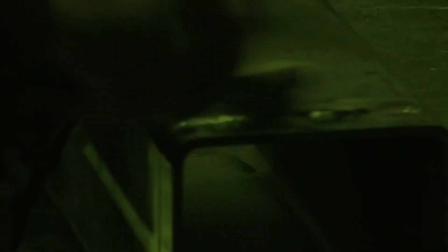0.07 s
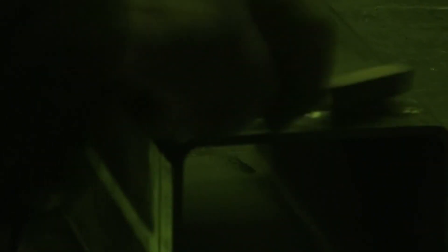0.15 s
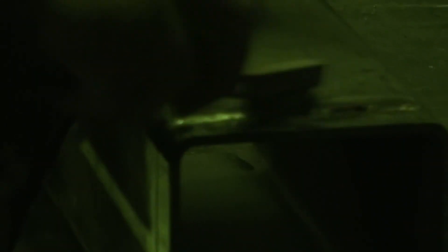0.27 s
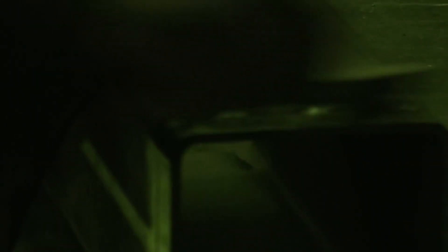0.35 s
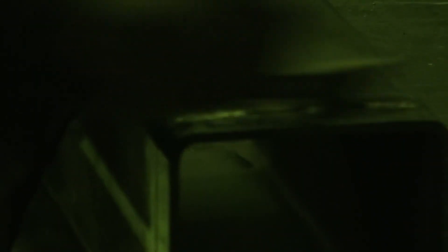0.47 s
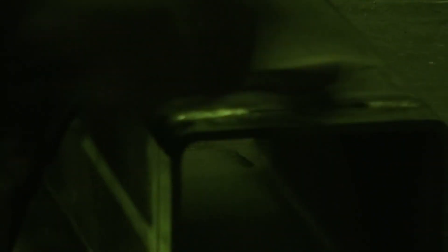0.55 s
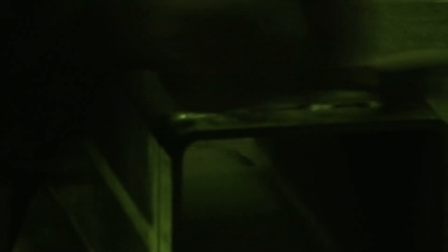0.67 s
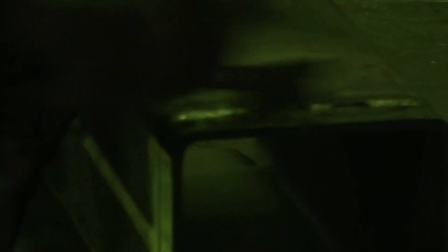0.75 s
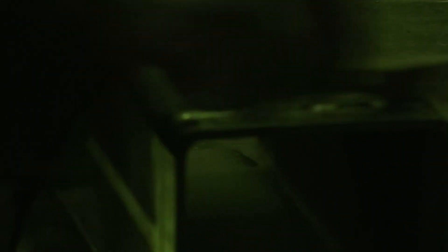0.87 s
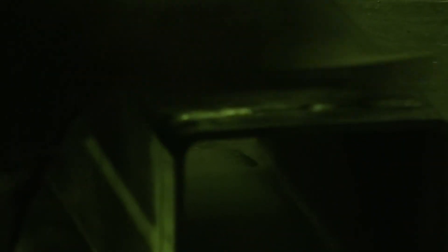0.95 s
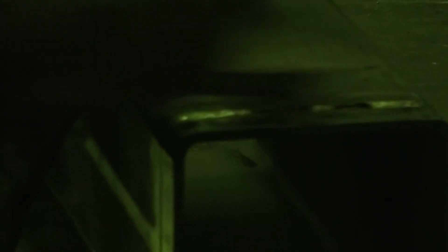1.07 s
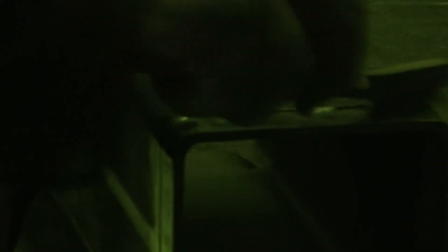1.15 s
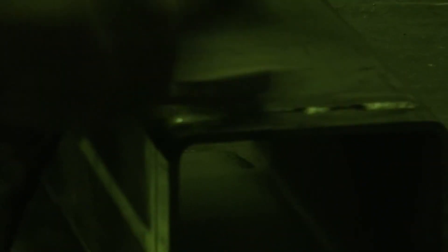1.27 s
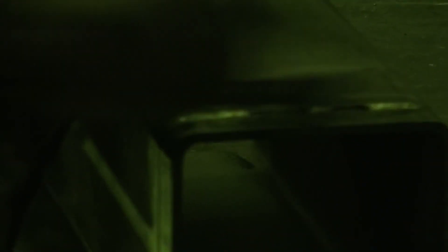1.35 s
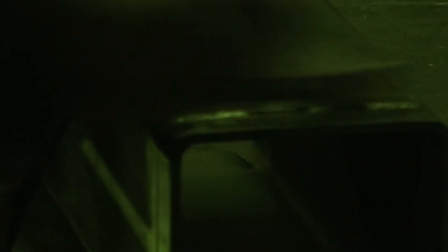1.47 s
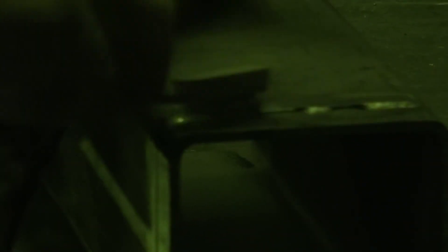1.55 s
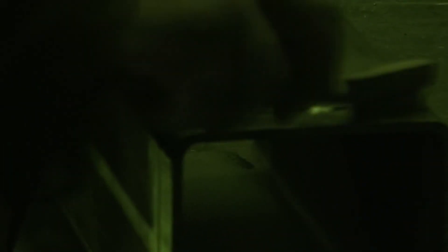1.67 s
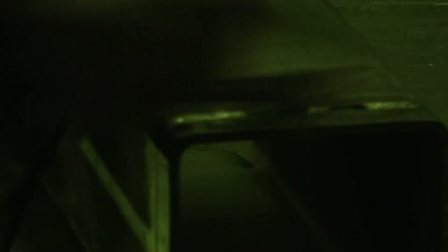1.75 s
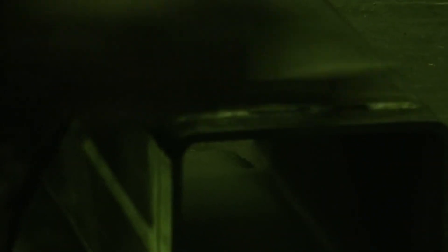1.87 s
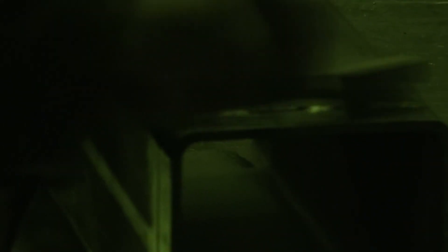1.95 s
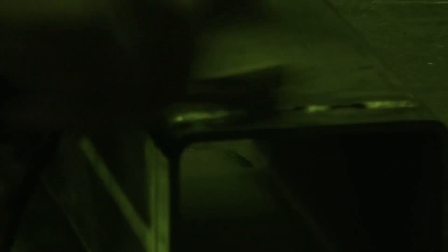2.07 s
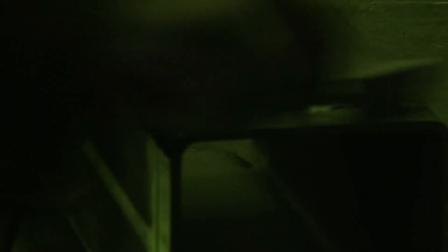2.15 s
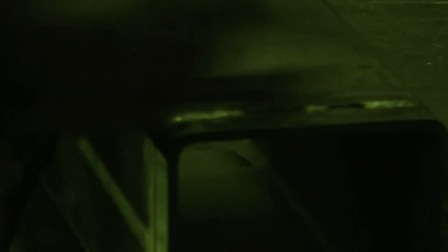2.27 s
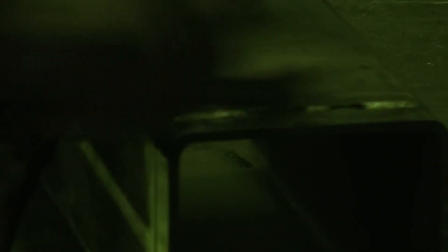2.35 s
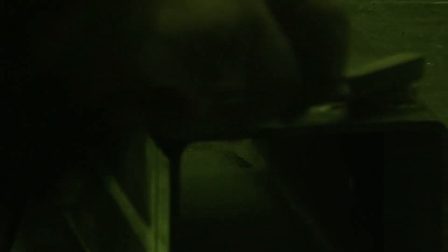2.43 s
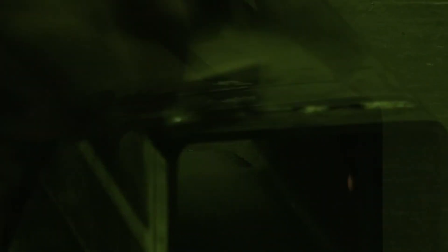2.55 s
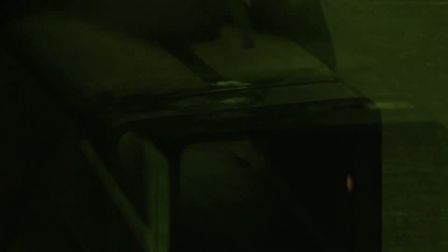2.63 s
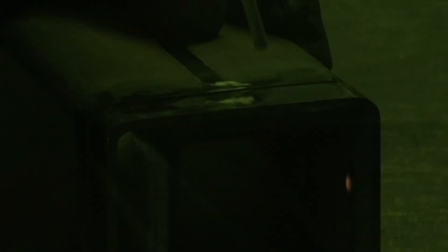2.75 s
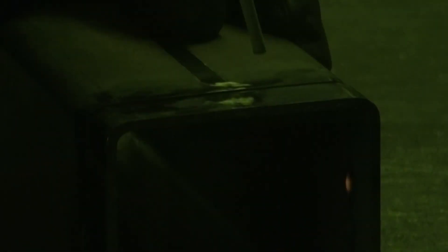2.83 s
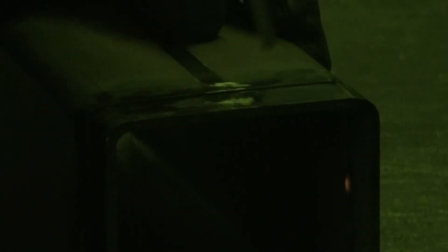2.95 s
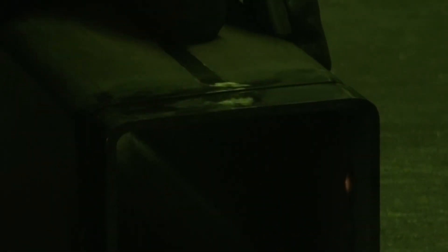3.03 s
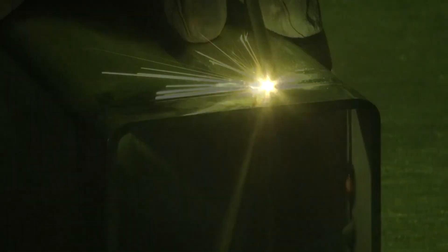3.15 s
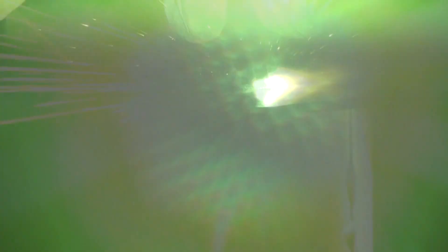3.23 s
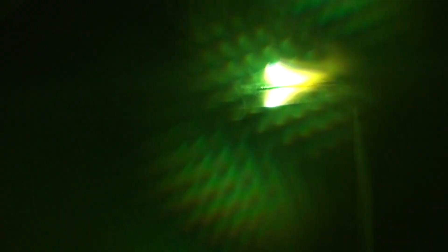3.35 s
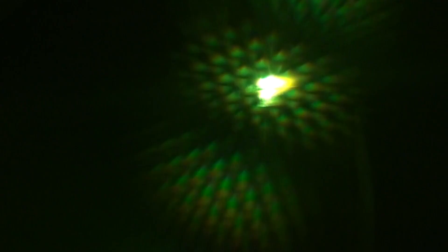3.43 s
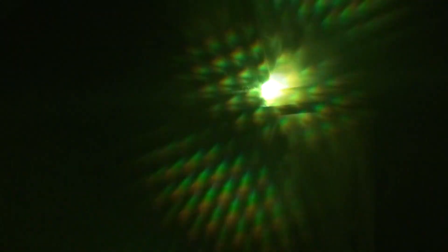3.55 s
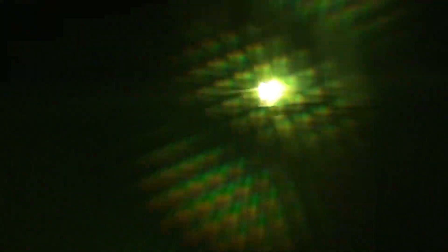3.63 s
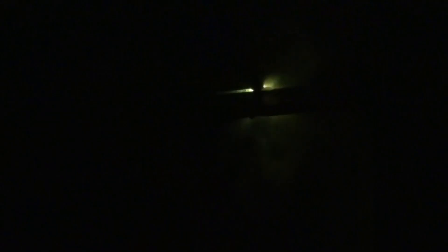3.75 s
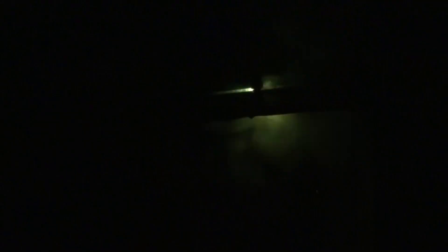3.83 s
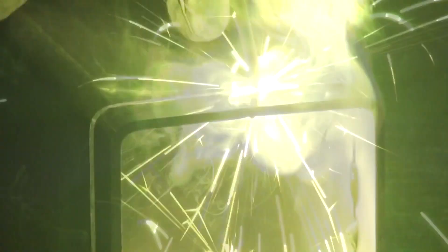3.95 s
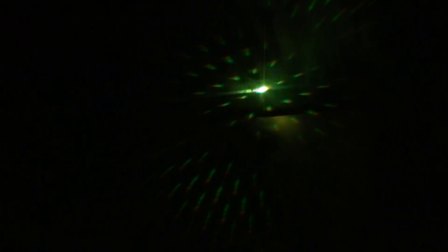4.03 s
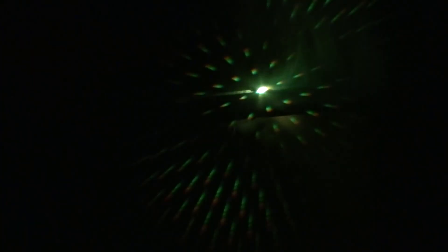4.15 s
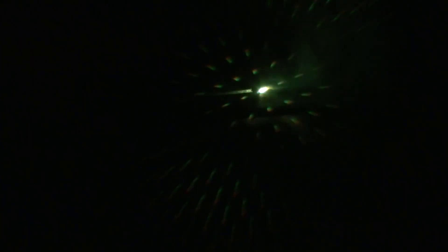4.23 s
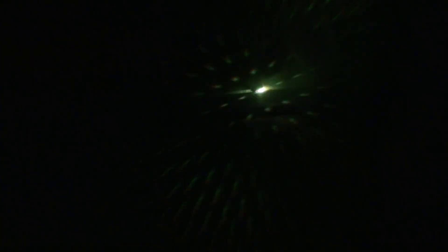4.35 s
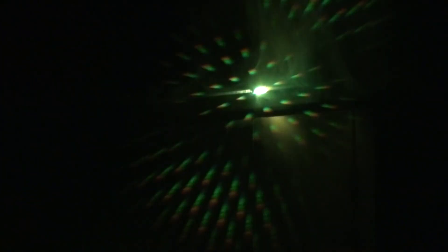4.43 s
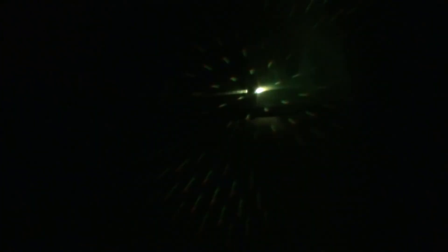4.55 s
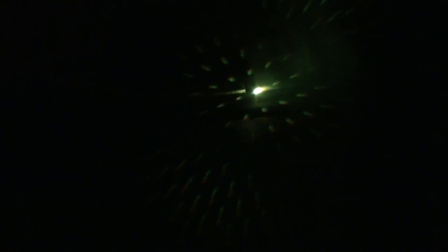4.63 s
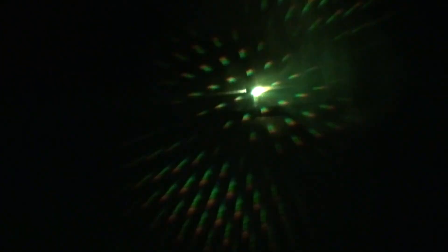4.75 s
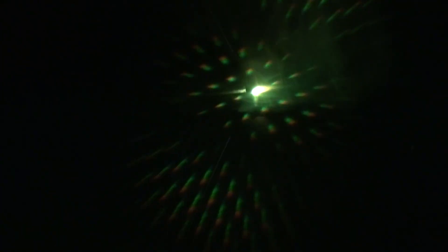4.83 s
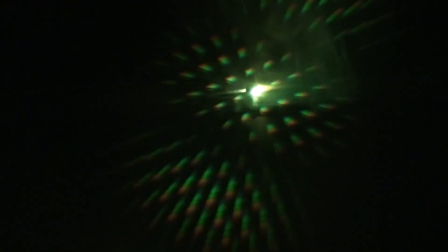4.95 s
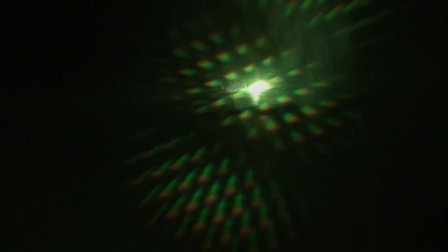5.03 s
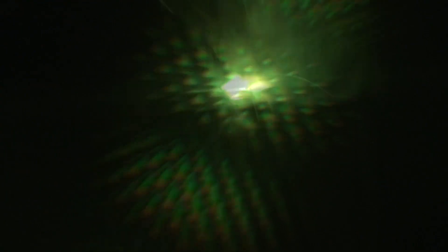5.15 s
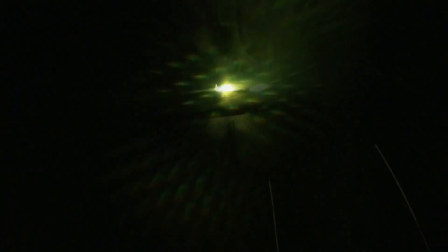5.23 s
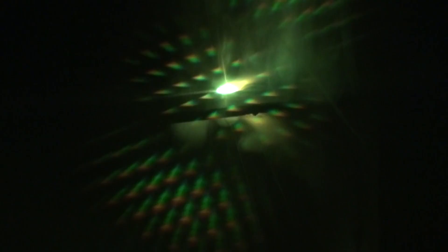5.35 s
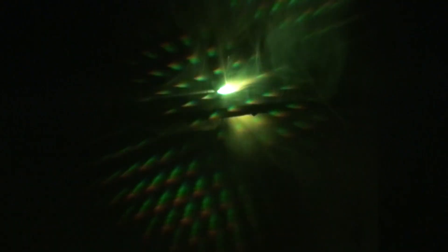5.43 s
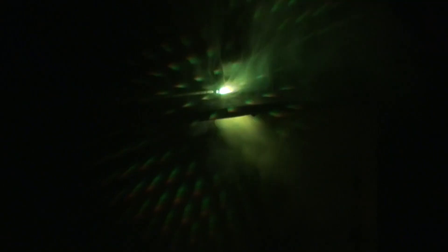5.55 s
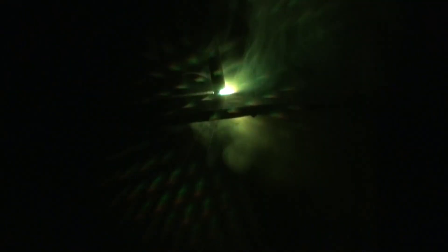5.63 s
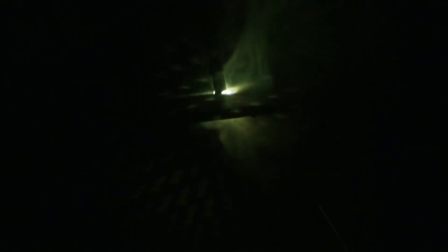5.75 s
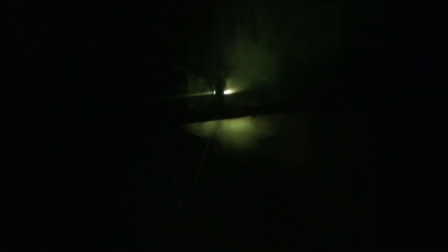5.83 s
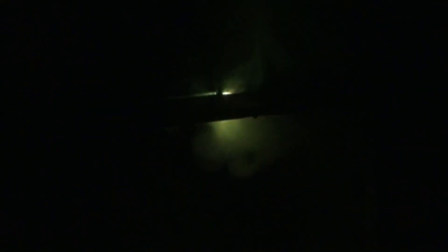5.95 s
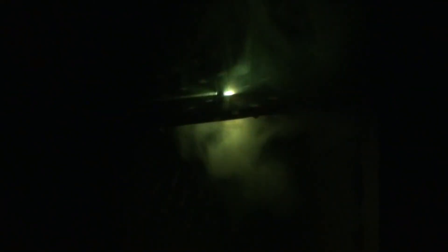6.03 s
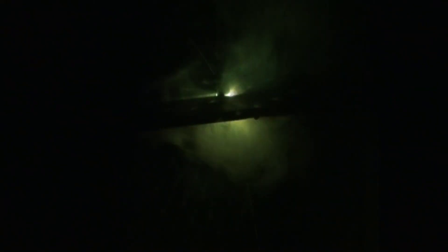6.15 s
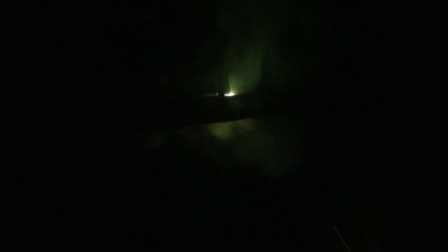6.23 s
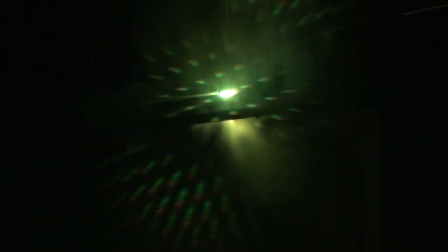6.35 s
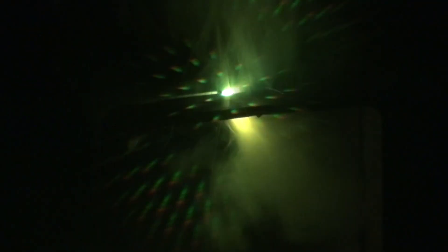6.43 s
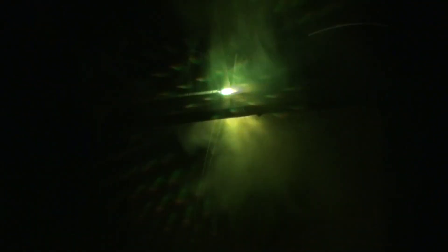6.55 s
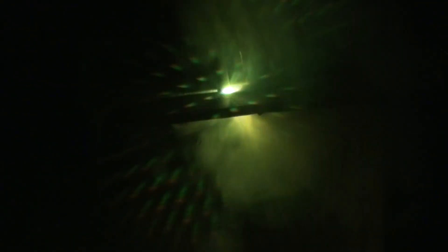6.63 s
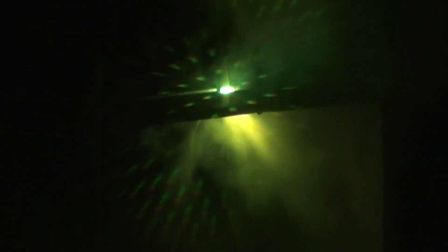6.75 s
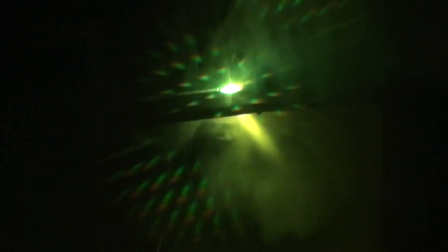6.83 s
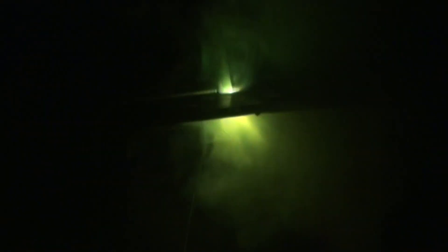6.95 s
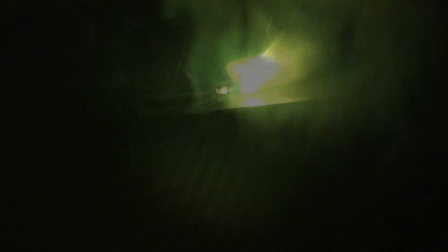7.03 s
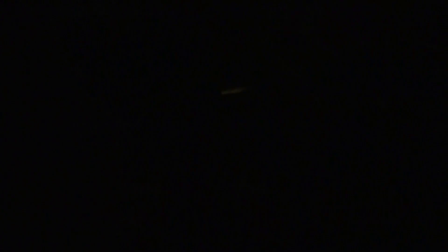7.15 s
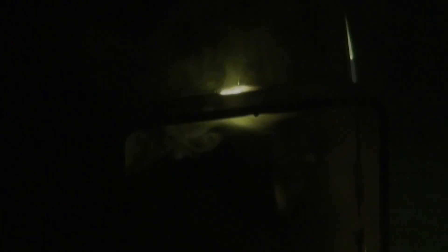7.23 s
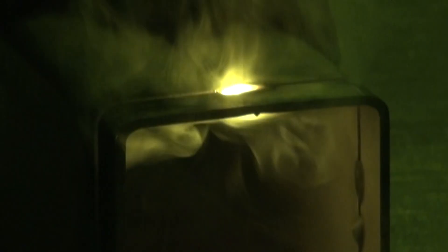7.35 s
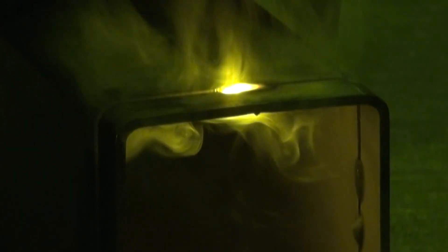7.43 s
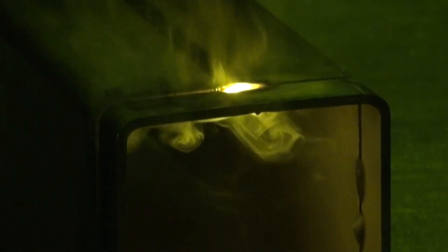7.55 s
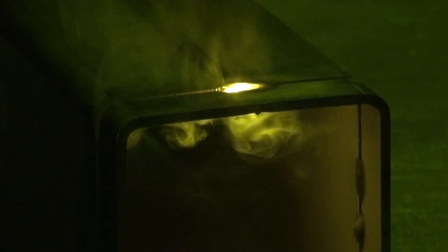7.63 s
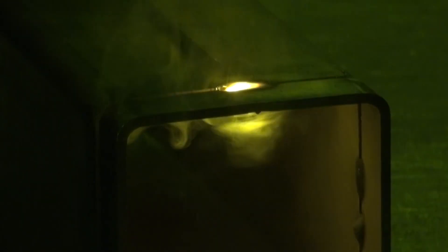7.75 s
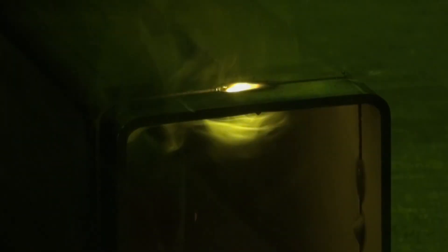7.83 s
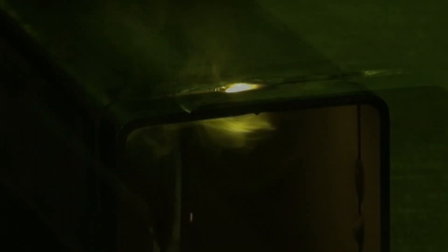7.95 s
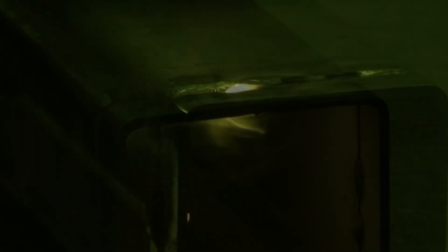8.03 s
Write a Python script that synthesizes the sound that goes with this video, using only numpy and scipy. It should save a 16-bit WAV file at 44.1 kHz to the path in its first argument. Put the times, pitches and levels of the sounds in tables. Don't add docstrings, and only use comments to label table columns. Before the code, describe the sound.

Slag is scraped off a steel tube over a whirring fan; a rod clanks, and a welding arc hisses and snaps loudly, then stops.

```python
import sys
import numpy as np
from scipy import signal
from scipy.fft import rfft, irfft, next_fast_len
from scipy.io import wavfile
from scipy.ndimage import uniform_filter1d, map_coordinates

SR = 44100
rng = np.random.default_rng(int(sys.argv[2]) if len(sys.argv) > 2 else 0)


def output_pcm(signal):
    pcm = np.clip(np.atleast_2d(signal).T, -1, 1) * 32767
    wavfile.write(sys.argv[1], SR, np.round(pcm).astype(np.int16))


def amplitude_ratio(level_db):
    exponent = np.asarray(level_db, float) / 20
    return 10 ** exponent


N = 356769

# multiple of the blade rate, level in dB.
BLADE_TONES = [(1, -45), (2, -57), (3, -58), (8, -55), (15.8, -52), (16, -49.5)]
# frequency in Hz, level in dB.
HUM_TONES = [(60, -44.5), (120, -57.5), (183, -40.5)]
# frequency in Hz, level in dB per Hz.
AIR_COLOUR = [(60, 1), (120, 1), (200, 1), (400, -1), (520, -2), (585, 6), (650, 0.5), (1000, 0),
              (2300, 1.5), (2900, -1.5), (4000, -9.5), (5300, -7.5), (6300, -8.5), (13000, -15)]
BLADE_16_HZ, LOAD_SAG_HZ, FOLLOW_S = 4571, 5.5, .3

# frequency in Hz, time to fall 60 dB in seconds.
ROOM_DECAY = [(300, 0.34), (3000, 0.46), (10000, 0.16)]

# middle in seconds, length in seconds, level in dB.
STROKES_TO_AND_FRO = [(.11, .08, -77), (.22, 0.11, -69), (0.333, .09, -69), (0.446, 0.12, -65),
                      (.57, 0.11, -66.5), (0.695, .11, -64), (0.833, 0.14, -65), (0.955, 0.13, -66),
                      (1.07, 0.15, -65.5), (1.21, 0.18, -63.5), (1.318, 0.078, -65), (1.385, 0.069, -63),
                      (1.463, 0.066, -63), (1.566, 0.17, -65.5), (1.668, .06, -67), (1.73, 0.11, -63),
                      (1.828, 0.12, -65), (1.925, 0.1, -60.5), (1.985, 0.078, -64), (2.08, 0.14, -65),
                      (2.215, 0.14, -64), (2.31, 0.08, -65), (2.37, 0.12, -71)]
# time in seconds, peak in dB.
SLAG_FLAKES = [(0.0892, -69), (0.2199, -62), (0.4668, -65), (0.6709, -60.5), (0.8799, -68), (0.9398, -69),
               (0.9597, -64), (1.0166, -67), (1.0605, -59), (1.145, -46), (1.2486, -64), (1.2999, -66),
               (1.3857, -61.5), (1.4321, -64), (1.5415, -52), (1.6526, -42), (1.7928, -70), (1.8891, -62),
               (1.921, -58), (1.9693, -54), (2.0492, -67), (2.1505, -65), (2.1811, -41), (2.2902, -63),
               (2.3116, -50), (2.4229, -43)]
# frequency in Hz, level in dB per Hz.
GRIT_COLOUR = [(300, -28), (1500, 2), (3000, 1), (7000, 5), (13000, 7)]
CONTACT_START_S, CONTACT_END_S, DRAG_DB = .08, 2.435, -83

# time in seconds, level in dB.
ROD_KNOCKS = [
    (3.218, -20),
    (3.2205, -9),
    (3.227, -22),
    (3.235, -19),
    (3.25, -21),
    (3.264, -17),
    (3.292, -18),
    (3.355, -19),
]
# frequency in Hz, level in dB, time to fall 60 dB in seconds.
TUBE_RINGS = [(467, -5, .15), (920, -10, .12), (1079, -11, .2), (1540, -11, .2), (1659, -6, .2),
              (2133, -3, .1), (2205, 0, .16), (2434, -2, .1), (2800, -5, .1), (3282, 2, .25),
              (4470, 0, .15), (5060, -5, .12), (5889, -7, .15), (6982, -4, .12)]
# frequency in Hz, level in dB per Hz.
CLATTER_COLOUR = [(200, -23), (500, -16), (1200, -12.5), (2200, -7.5), (3500, -18), (6000, -9.5),
                  (9000, -11), (14000, -15)]

# time in seconds, current as hiss level in dB, thin fizz over hiss in dB
ARC_COURSE = [(3.28, -29.5, -34), (3.45, -29, -45), (3.64, -26.5, -38), (3.8, -29, -34.5), (4.2, -28, -30),
              (4.55, -28, -34.5), (4.75, -29, -33.5), (5.0, -25.5, -35.5), (5.2, -29.5, -35),
              (5.46, -22.5, -35.5), (5.68, -24.5, -35.5), (5.88, -29, -36), (6.3, -31, -35),
              (6.55, -22, -38), (6.7, -27, -39), (6.8, -19.5, -34.5), (7.09, -27.5, -37), (7.15, -38, -42)]
# start in seconds, dB over the hiss,
# low roar in dB over that.
METAL_FLARES = [(3.355, -15, 24), (3.63, 2.5, -11), (3.759, 16, -4), (4.06, 2.5, 8), (4.52, 4.5, -5),
                (4.87, 1, -4), (4.96, 3.5, -18), (5.04, 4, -4), (5.23, 5, -6), (5.29, -0.5, -11),
                (5.53, 2.5, -8.5), (6.481, 1, 8), (6.6, 1.5, 7.5), (6.788, -0.5, 12), (6.9, 1, 0),
                (7.02, 3, -8)]
FLARE_RISE_S, FLARE_FALL_S = 0.0067, 0.03
# end in seconds, length in seconds, depth in dB.
SHORT_CIRCUITS = [
    (3.806, 0.053, 24),
    (4.077, 0.033, 30),
    (4.835, 0.013, 12),
    (5.102, 0.02, 17),
    (5.19, .03, 24),
    (5.399, .03, 8),
    (5.42, .02, 18),
    (6.038, 0.019, 1),
]
ROAR_DB, ROAR_GROWS, AFTERGLOW_DB_PER_S = 0.5, 0.27, 22
SPUTTER_PER_S, SPUTTER_DEPTH, SPUTTER_T60_S = 45, .25, .05

# time in seconds, peak in dB, low pop and thin top in dB relative to it.
LOUD_CRACKS = [(3.4622, -11, -15, -59), (3.8089, -1, -21, -45), (4.1436, -3, -22, -44),
               (4.2354, -1, -25, -45), (4.2524, -2, -23, -43), (4.423, -10, -15, -47),
               (4.5198, -11, -13, -46), (4.8226, -11, -14, -40), (5.2332, -10, -11, -46),
               (5.3993, 0, -22, -40), (5.5016, -7, -18, -50), (5.539, -7, -16, -49), (5.5854, -3, -20, -55),
               (5.6238, -5, -18, -51), (5.6622, -7, -19, -47), (5.6836, -3, -22, -51),
               (5.7694, -5, -19, -48), (5.8208, -8, -18, -41), (5.8513, -4, -24, -44),
               (6.0289, -2, -26, -43), (6.0638, -3, -24, -42), (6.397, -2, -23, -49),
               (6.4878, -9, -14, -49), (6.5831, -3, -20, -49), (6.611, -5, -17, -47),
               (6.8375, -10, -12, -45), (6.9463, -7, -17, -47), (6.9847, -6, -18, -48),
               (7.0301, -5, -11, -49), (7.0919, -5, -20, -56)]
# time in seconds, peak in dB, thin top in dB relative to it.
SMALL_SNAPS = [(3.5464, -13, -53), (3.5793, -12, -53), (3.6287, -11, -50), (3.7055, -13, -52),
               (3.8744, -7, -44), (4.0128, -12, -47), (4.0577, -13, -37), (4.2064, -11, -35),
               (4.2774, -11, -42), (4.3096, -10, -39), (4.364, -10, -44), (4.4654, -10, -44),
               (4.5944, -13, -44), (4.6713, -12, -46), (4.79, -9, -41), (4.8459, -10, -50),
               (5.0978, -10, -43), (5.1387, -14, -45), (5.1941, -12, -45), (5.2629, -10, -47),
               (5.3254, -14, -46), (5.6444, -7, -47), (5.7054, -9, -46), (6.1724, -13, -39),
               (6.2228, -9, -48), (6.3415, -11, -42), (6.3679, -11, -40), (6.4504, -12, -49),
               (6.8554, -7, -48), (6.8894, -8, -50)]
SNAP_POP_DB = -19
# time in seconds, peak in dB.
SPATTER_TICKS = [(3.804, -47), (3.8277, -23), (3.8904, -48), (4.779, -30), (4.9564, -48), (5.1093, -36),
                 (5.8464, -28), (6.0254, -26), (6.1025, -50), (6.111, -48), (6.1904, -31), (6.7166, -51)]
# time in seconds, level in dB.
DROP_BURSTS = [
    (3.356, -18),
    (3.63, -21),
    (5.233, -26),
    (5.239, -8),
    (6.454, -27),
    (6.608, -18),
    (6.841, -17),
    (7.029, -7.5),
]
BLOW_DB, BLOW_GROWS = 16, 1
TOP_DB, TOP_GROWS = 67.5, 1.18
POP_DB, POP_GROWS = 9, 0.72
SPIT_DB, SPIT_GROWS, SPIT_T60_S = -17, .7, .009

# frequency in Hz, level in dB per Hz.
HISS_COLOUR = [(300, -41.5), (1000, -1.5), (2000, -3.5), (3200, 0.5), (4600, 1.5), (6000, 1), (8000, -29.5),
               (14000, -42)]
ROAR_COLOUR = [(150, -24.5), (500, -4.5), (1200, 0), (2200, -16), (4000, -5.5)]
FIZZ_COLOUR = [(3000, -30.5), (5500, -5), (8000, 0), (12000, 5), (14000, -2), (16000, -17)]
CRACK_COLOUR = [(300, -17.5), (1000, -14.5), (2000, -9), (3500, 0.5), (5500, -4), (7500, 0.5), (10500, 1.5),
                (15000, -22)]
# frequency in Hz, width in Hz, level in dB.
JOINT_HOLLOWS = [(1475, 38, -10), (2335, 104, 2), (2620, 51, -7), (3300, 150, -18), (3890, 97, -3),
                 (4350, 103, -8), (4470, 68, -1), (4640, 49, -4), (5170, 76, -12), (6770, 290, 2),
                 (8200, 200, -18)]

# frequency in Hz, level in dB.
MICROPHONE = [(25, -38), (60, -24.5), (200, -11.5), (500, 1), (4000, 1), (5000, -4.5), (6300, -12),
              (8000, -18), (9000, -29), (9700, -38.5), (10200, -57), (10700, -42), (11600, -39),
              (13000, -47), (16000, -57)]


def unit(x):
    return x / np.sqrt(np.mean(x ** 2) + 1e-20)


def along(points, hz):
    f, v = np.transpose(points)
    return np.interp(np.log(hz + 1), np.log(f + 1), v)


def curves(rows):
    s, *columns = np.transpose(rows)
    return [np.interp(np.arange(N) / SR, s, column) for column in columns]


def during(start, end):
    t = np.arange(N) / SR
    return uniform_filter1d(1. * (t >= start) * (t <= end), size=200)


def wobble(rate):
    knots = rng.standard_normal(int(N * rate / SR) + 4)
    return map_coordinates(knots, [np.arange(N) * rate / SR])


def filtered(x, response):
    m = next_fast_len(N + SR // 2, real=True) // 2 * 2
    return irfft(rfft(x, m) * response(np.fft.rfftfreq(m, 1 / SR)), m)[..., :N]


def coloured(x, points):
    def response(hz):
        cepstrum = irfft(np.log(amplitude_ratio(along(points, hz))))
        cepstrum[1:len(hz) - 1] *= 2
        cepstrum[len(hz):] = 0
        return np.exp(rfft(cepstrum))
    return filtered(x, response)


def resonance(f, centre, width):
    return 1j * f * width / (centre * centre - f * f + 1j * f * width)


def sparks(per_s, spread_db):
    draw = rng.random((3, N))
    size = amplitude_ratio(np.minimum(-spread_db * np.log(draw[1] + 1e-9), 3 * spread_db))
    happens = draw[0] < per_s / SR
    return unit(happens * size * np.sign(draw[2] - .5))


def blows(rows):
    out = np.zeros(N)
    for s, db in rows:
        out[round(s * SR)] = -amplitude_ratio(db)
    return out


def spits(rows, t60):
    fall = amplitude_ratio(-60 * np.arange(SR // 8) / SR / t60)
    return signal.fftconvolve(blows(rows), fall)[:N] * rng.standard_normal(N)


def fan():
    t = np.arange(N) / SR
    load = uniform_filter1d(during(ARC_COURSE[0][0], ARC_COURSE[-1][0]), size=round(FOLLOW_S * SR))
    top_hz = BLADE_16_HZ - LOAD_SAG_HZ * load

    z = signal.stft(rng.standard_normal(N + 512), nperseg=512)[2]
    patches = uniform_filter1d(rng.standard_normal(z.shape), size=5, axis=0)
    patches = uniform_filter1d(patches, size=10, axis=1)
    air = signal.istft(z * amplitude_ratio(1. * unit(patches)), nperseg=512)[1][:N]
    rush = amplitude_ratio(-26.5) * unit(coloured(air, AIR_COLOUR))

    turn = 2 * np.pi * np.cumsum(top_hz / 16) / SR
    tones = np.zeros(N)
    for multiple, db in BLADE_TONES:
        level = amplitude_ratio(db + 7.5 + 2.5 * wobble(16))
        tones += level * np.sin(multiple * turn + .5 * wobble(12))

    hum = np.zeros(N)
    for hz, db in HUM_TONES:
        level = amplitude_ratio(db + 1.5 + 1.9 * wobble(14))
        hum += level * np.sin(2 * np.pi * hz * t + 0.8 * wobble(20))
    return rush + tones + hum


def shop(x):
    hz, t, z = signal.stft(rng.standard_normal(SR // 2), SR, nperseg=256)
    decay = amplitude_ratio(-60 * t / along(ROOM_DECAY, hz)[:, None])
    tail = signal.istft(z * decay, SR, nperseg=256)[1]
    late = np.pad(x, (200, 0))
    return signal.fftconvolve(late, tail / np.linalg.norm(tail))[:N]


def scraping():
    t = np.arange(N) / SR
    speed = amplitude_ratio(DRAG_DB) * during(CONTACT_START_S, CONTACT_END_S)
    for middle, length, db in STROKES_TO_AND_FRO:
        speed += amplitude_ratio(db) * np.clip(1 - (2 * (t - middle) / length) ** 2, 0, 1)
    grains = rng.standard_normal(N) + 1.16 * sparks(800, spread_db=2.5)
    grit = unit(coloured(grains, GRIT_COLOUR))
    flakes = coloured(spits(SLAG_FLAKES, t60=0.012), GRIT_COLOUR)
    return speed * amplitude_ratio(39 + 1.0 * wobble(40.36)) * grit + amplitude_ratio(28.5) * flakes


def rod():
    chatter = spits(ROD_KNOCKS, t60=.045) + amplitude_ratio(15) * blows(ROD_KNOCKS)

    def tube(f):
        total = 0
        for centre, db, t60 in TUBE_RINGS:
            width = np.log(1000) / np.pi / t60
            total = total + amplitude_ratio(db) * np.sqrt(t60) * resonance(f, centre, width)
        return total

    ringing = filtered(chatter, tube)
    clatter = coloured(spits(ROD_KNOCKS, t60=0.11), CLATTER_COLOUR)
    return amplitude_ratio(31) * ringing + amplitude_ratio(15.0) * clatter


def sputter():
    fall = amplitude_ratio(-60 * np.arange(SR // 8) / SR / SPUTTER_T60_S)
    jumps = np.abs(sparks(SPUTTER_PER_S, spread_db=2))
    return 1 + SPUTTER_DEPTH * unit(signal.fftconvolve(jumps, fall)[:N])


def burning():
    t = np.arange(N) / SR
    hiss_db, fizz_db = curves(ARC_COURSE)
    roar_db = ROAR_DB + (ROAR_GROWS - 1) * (hiss_db + 34)
    for s, db, low_db in METAL_FLARES:
        since = np.maximum(t - s, 0)
        flare = (1 - np.exp(-since / FLARE_RISE_S)) * np.exp(-since / FLARE_FALL_S) * 2
        hiss_db = hiss_db + db * flare
        roar_db = roar_db + low_db * flare
    for end, length, depth_db in SHORT_CIRCUITS:
        hiss_db = hiss_db - depth_db * np.clip(1 - (end - t) / length, 0, 1) * (t < end)
    hiss_db = hiss_db - AFTERGLOW_DB_PER_S * np.maximum(t - ARC_COURSE[-1][0], 0)
    flicker_db = 0.43 * wobble(30) + 1.66 * wobble(120)
    power = (t > ARC_COURSE[0][0]) * sputter() * amplitude_ratio(hiss_db - 2 + flicker_db)
    return power, fizz_db, roar_db


def arc():
    power, fizz_db, roar_db = burning()
    plasma = power * unit(rng.standard_normal(N) + 1.6 * sparks(1000, spread_db=4.5))
    hiss = amplitude_ratio(4.5) * coloured(plasma, HISS_COLOUR)
    fizz = coloured(amplitude_ratio(fizz_db + 44.0) * plasma, FIZZ_COLOUR)
    roar = power * amplitude_ratio(roar_db) * unit(coloured(rng.standard_normal(N), ROAR_COLOUR))

    bangs = LOUD_CRACKS + [(s, db, SNAP_POP_DB, top_db) for s, db, top_db in SMALL_SNAPS]
    blow_rows = [(s + .001, BLOW_GROWS * db + BLOW_DB) for s, db, _, _ in bangs]
    top_rows = [(s + 0.001074, db + TOP_GROWS * top_db + TOP_DB) for s, db, _, top_db in bangs]
    spit_rows = [(s + 0.0012, SPIT_GROWS * db + SPIT_DB) for s, db, _, _ in bangs]
    pop_rows = [(s + 0.0018, db + POP_GROWS * low_db + POP_DB) for s, db, low_db, _ in bangs]

    crackle = power * sparks(200, spread_db=3)
    cracks = blows(blow_rows) + crackle + amplitude_ratio(7.0) * spits(spit_rows, t60=SPIT_T60_S)
    tops = coloured(blows(top_rows) + amplitude_ratio(42) * blows(SPATTER_TICKS), FIZZ_COLOUR)
    pops = coloured(spits(pop_rows + DROP_BURSTS, t60=0.011), ROAR_COLOUR)

    def joint(f):
        return 1 + sum(amplitude_ratio(db + 0.5) * resonance(f, centre, width) for centre, width, db in JOINT_HOLLOWS)

    bright = filtered(hiss + fizz + tops + coloured(cracks, CRACK_COLOUR), joint)
    return bright + roar + amplitude_ratio(2.0) * pops


def scene():
    bench = scraping() + rod() + arc()
    return (bench + amplitude_ratio(-6.5) * shop(bench) + fan())[None]


def band_limit(x):
    return signal.sosfilt(signal.butter(12, 15760, fs=SR, output="sos"), x)


def record(dry):
    mix = np.clip(coloured(dry, MICROPHONE), -1, 1)
    return band_limit(mix)


dry = scene()
out = record(dry)
output_pcm(out)
```